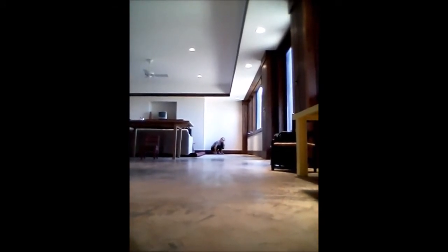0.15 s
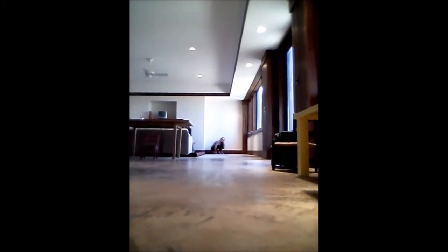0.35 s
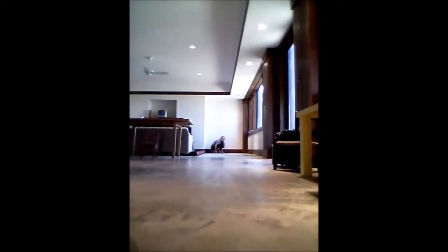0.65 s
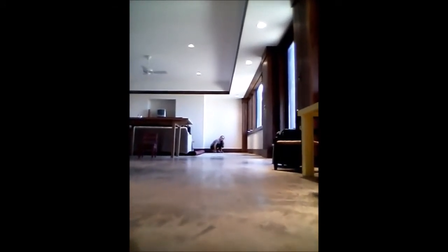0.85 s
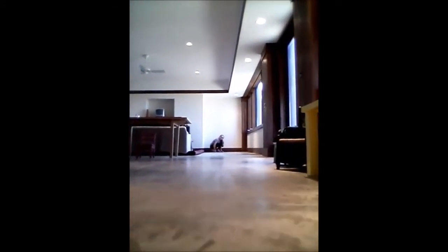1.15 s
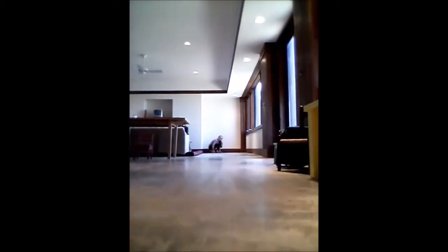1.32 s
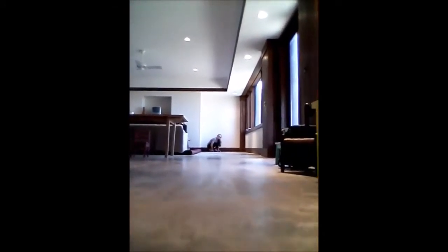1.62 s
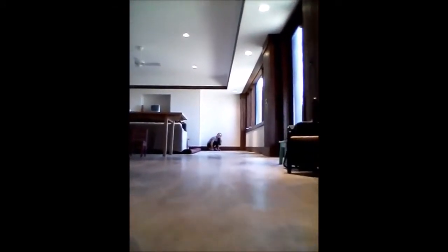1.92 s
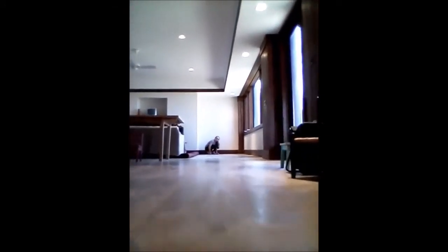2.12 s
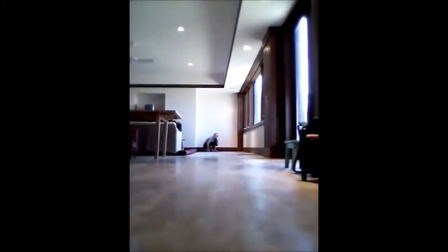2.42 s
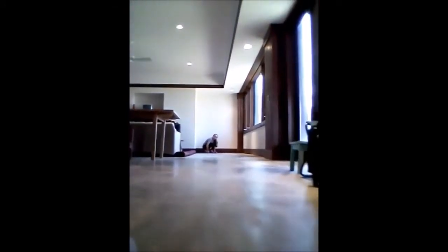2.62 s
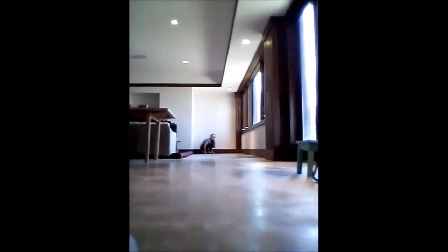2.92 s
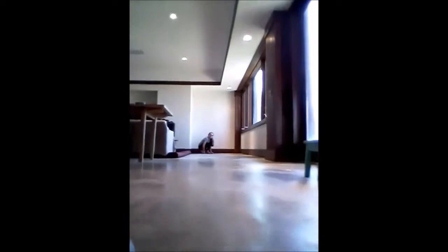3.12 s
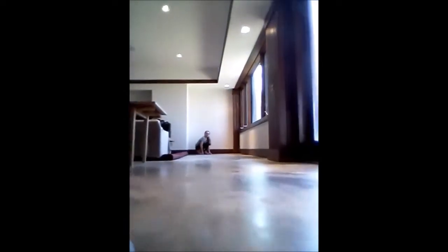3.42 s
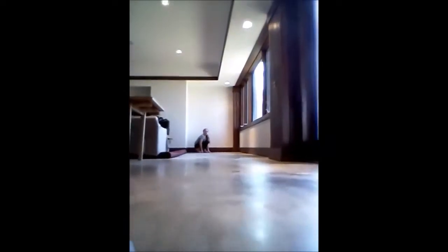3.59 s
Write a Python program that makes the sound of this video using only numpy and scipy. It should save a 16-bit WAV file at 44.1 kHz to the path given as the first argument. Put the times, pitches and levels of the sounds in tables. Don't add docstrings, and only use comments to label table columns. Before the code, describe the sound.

A light spring-driven car starts with a soft click, rolls quietly over a hard indoor floor, then gathers speed into a loud rumble with knocks, ticks and axle hiss, heard from a microphone riding on it.

```python
import sys
import numpy as np
from scipy import signal
from scipy.fft import rfft, irfft
from scipy.io import wavfile
from scipy.ndimage import uniform_filter1d, map_coordinates

SR = 44100
rng = np.random.default_rng(int(sys.argv[2]) if len(sys.argv) > 2 else 0)


def unload_audio(sound):
    columns = np.transpose(np.atleast_2d(sound))
    steps = np.round(np.clip(columns, -1, 1) * 32767)
    wavfile.write(sys.argv[1], SR, steps.astype(np.int16))


def gain_from_decibels(decibels):
    exponent = np.asarray(decibels, float) / 20
    return 10 ** exponent


N = 165375
T = np.arange(N) / SR


def rms1(x):
    return x / np.sqrt(np.mean(x ** 2))


def band(x, lo_hz, hi_hz):
    return signal.sosfilt(signal.butter(2, [lo_hz, hi_hz], "band", fs=SR, output="sos"), x)


def ring(x, hz, t60_s):
    r = np.exp(-np.log(1000) / (max(t60_s, 1e-3) * SR))
    w = 2 * np.pi * hz / SR
    return signal.lfilter([0, r * np.sin(w)], [1, -2 * r * np.cos(w), r * r], x)


def walk(rate_hz):
    hold = int(SR / rate_hz)
    steps = np.repeat(rng.standard_normal(N // hold + 1), hold)[:N]
    return rms1(uniform_filter1d(uniform_filter1d(steps, hold), hold))


def body(x, modes, drift_db=0., drift_hz=8.):
    out = np.zeros(N)
    for k, (hz, width_hz, db) in enumerate(modes):
        gain = (-1) ** k * gain_from_decibels(db) * width_hz * 2 * np.pi / SR
        drive = x * gain_from_decibels(drift_db * walk(drift_hz))
        out += gain * ring(drive, hz, np.log(1000) / np.pi / width_hz)
    return out


def grit(rate_hz, spread_db, patch_db, patch_hz):
    hit, sign, size = rng.random((3, N))
    clicks = (hit < rate_hz / SR) * np.sign(sign - .5) * gain_from_decibels(-spread_db * np.log(1 - size))
    return rms1(clicks) * gain_from_decibels(patch_db * walk(patch_hz))


def bursts(times_s, gains, lengths_s, strike):
    t = np.arange(2048) / SR
    events = []
    for s, gain, length in zip(times_s, gains, lengths_s):
        scratch = rng.standard_normal(len(t)) * np.exp(-t / length) / np.sqrt(length * SR)
        events.append((int(s * SR), gain * (scratch + strike * (t == 0))))
    return events


def add(x, start, piece):
    x[start:start + len(piece)] += piece[:len(x) - start]


# (frequency [Hz], density [dB per Hz])
AIR_SPECTRUM = [(30, -12), (125, -21.5), (300, 0), (700, -14), (1500, -22.5), (3000, -35.5), (15000, -40.5)]


def room():
    phase = 2 * np.pi * 120 * T
    hum = np.sin(phase)
    buzz = band(np.exp(4.6 * np.cos(phase)), 150., 600.)
    hz, db = np.array(AIR_SPECTRUM).T
    f = np.fft.rfftfreq(N, 1 / SR)
    shape = gain_from_decibels(np.interp(np.log(f + 1), np.log(hz), db))
    air = irfft(rfft(rng.standard_normal(N)) * shape, N)
    return gain_from_decibels(-59) * rms1(hum) + gain_from_decibels(-66) * rms1(buzz) + gain_from_decibels(-57.5) * rms1(air)


# (frequency [Hz], level [dB], t60 [s])
CATCH_MODES = [(110, 2.5, 0.18), (250, -5, 0.055), (578, 4, 0.037), (840, 1, 0.011), (1120, 1, 0.031),
               (1730, -26, 0.095)]


def catch():
    click = np.zeros(N)
    click[int(.0088 * SR)] = gain_from_decibels(-30)
    modes = sum(gain_from_decibels(db) * ring(click, hz, min(t60_s, .15)) for hz, db, t60_s in CATCH_MODES)
    scrape = signal.lfilter([1], [1, -.993], click) * rng.standard_normal(N)
    return modes + gain_from_decibels(-9) * band(scrape, 700., 3100.0)


# (time [s], level [dB])
SNAPS = [
    (1.5621, -4.5),
    (1.3345, -17),
    (2.573, -17),
    (3.168, -13),
    (3.424, -17),
    (3.542, -13.5),
    (3.181, -22),
    (3.61, -12),
    (3.651, -24),
    (3.745, -19),
]


def snaps():
    clicks = np.zeros(N)
    for s, db in SNAPS:
        clicks[int(s * SR)] = gain_from_decibels(db)
    return ring(band(clicks, 900., 6000.), 2220.0, 0.0015) + gain_from_decibels(-14) * band(clicks, 3000., 12000.0)


# (frequency [Hz], level [dB], t60 [s])
LOOSE_MODES = [(2060, -20.5, .01), (3270, -4, 0.025), (4120, -14, 0.057), (4610, 4, 0.0096),
               (5490, 4.5, 0.0046), (6070, 7.5, 0.0028), (7050, -3.5, 0.01), (9200, -36, .006),
               (10800, -47, .005)]
# (time [s], level [dB], centre [Hz])
TICKS = [(0.245, -39, 3160), (1.2917, -33.5, 4670), (1.316, -32, 6200), (1.334, -4.5, 4750),
         (1.3436, -17, 4500), (1.352, -21, 4570), (1.4386, -42, 4540), (1.511, -28.5, 3740),
         (1.5397, -30, 5690), (1.5892, -30, 4190), (1.593, -28, 5700), (1.6387, -31, 4200),
         (1.676, -34, 5610), (1.712, -32, 4470), (1.7493, -36, 5700), (1.8134, -38, 5500),
         (1.9185, -31.5, 4600), (1.962, -18, 4160), (1.997, -26, 4000), (2.062, -45, 5400),
         (2.249, -20.5, 4170), (2.2918, -32, 6000), (2.3447, -21.5, 3060), (2.4642, -19.5, 3140),
         (2.4947, -20.5, 6400), (2.5485, -16, 4840), (2.7154, -32.5, 4220), (2.8892, -23.5, 3200),
         (2.9016, -23.5, 4420), (3.0173, -31.5, 4520), (3.0284, -27, 4140), (3.0473, -25.5, 5530),
         (3.1135, -38, 4700), (3.242, -32, 5640), (3.3703, -31.5, 3200), (3.586, -31, 6500),
         (3.6043, -18.5, 3040), (3.6522, -16, 3140)]


def ticks():
    vary_db, vary_pitch = 1.5, .012
    times_s, levels_db, centres_hz = np.array(TICKS).T
    lengths_s = np.interp(levels_db, (-32, -22), (.005, .0016))
    out = np.zeros(N)
    for (start, hit), centre in zip(bursts(times_s, gain_from_decibels(levels_db), lengths_s, 4.0), centres_hz):
        hit = hit * np.minimum(np.arange(len(hit)) / SR / 0.00092 + 0.044, 1)
        for hz, db, t60_s in LOOSE_MODES:
            e = rng.standard_normal()
            off_centre_db = 25 * np.log2(hz / centre) ** 2
            gain = gain_from_decibels(db + vary_db * e - off_centre_db)
            add(out, start, gain * ring(hit, hz * (1 + vary_pitch * e), t60_s))
    return band(band(out, 2500.0, 10000.0), 1700., 14000.) * gain_from_decibels(-4)


# (frequency [Hz], width [Hz], gain [dB])
FRAME_MODES = [(73.7, 38, 3), (103.4, 32, 4.5), (186, 30.8, -1.5), (244.8, 47.3, -2.5), (318, 43, -1.5),
               (420.5, 21.4, -8.5), (539.5, 71, -11)]
# (time [s], level [dB])
LURCHES = [(0.845, -25), (1.105, -24), (1.185, -19), (1.413, -18), (1.532, -16.5), (1.758, -16.5),
           (2.017, -19.5), (2.227, -17.5), (2.309, -17.5), (2.393, -16.5), (2.532, -19), (2.656, -11),
           (2.888, -15.5), (3.159, -23), (3.233, -10), (3.514, -17), (3.668, -12.5)]
# (time [s], level [dB], pitch [Hz])
THUDS = [(0.404, -26.5, 284), (1.238, -23.5, 186), (1.676, -20.5, 196), (1.707, -23.5, 261),
         (1.851, -10.5, 183), (1.893, -8, 176), (1.955, -6.5, 327), (2.211, -16.5, 240), (2.346, -19, 299),
         (2.383, -16, 255), (2.536, -12, 194), (2.714, -9.5, 269), (2.8, -6, 276), (2.976, -17, 254),
         (3.034, -3.5, 234), (3.183, -13, 240), (3.333, -14, 250), (3.419, -8, 301), (3.517, -9, 300),
         (3.589, -6.5, 183), (3.642, -15.5, 248), (3.714, -10, 254)]


def blow(hz, rise_s, t60_s):
    t = np.arange(6000) / SR
    return np.sin(2 * np.pi * hz * t) * (1 - np.exp(-t / rise_s)) * gain_from_decibels(-60 * t / t60_s)


def thuds():
    out = np.zeros(N)
    low_hz, high_hz = FRAME_MODES[0][0], FRAME_MODES[1][0]
    swing = blow(high_hz, 0.007, 0.15) + gain_from_decibels(-6.5) * blow(low_hz, 0.018, 0.16)
    for s, db in LURCHES:
        add(out, int(s * SR), gain_from_decibels(db + 5.5) * swing)
    for s, db, hz in THUDS:
        add(out, int(s * SR), gain_from_decibels(db + 1) * blow(hz, 0.003, 0.088))
    return out


# (frequency [Hz], width [Hz], gain [dB])
DECK_MODES = [(607, 30, -2), (717.5, 62, -2), (728.5, 29.3, 6), (774.2, 64.7, -2.5), (864, 28, -10),
              (920, 87, -25.5), (1315, 46, -21.5), (1485, 50, -18.5)]
# (frequency [Hz], width [Hz], gain [dB])
AXLE_MODES = [(1028, 810, -8), (1648, 120, -4), (1850, 154, -2.5), (2112, 340, -3.5), (2296, 294, -5.5),
              (3245, 266, -20)]
# (time [s], level [dB], bright share [dB])
BUMPS = [(0.244, -33.5, -1), (0.414, -16.5, -26), (1.067, -19.5, -17), (1.505, -11, -11),
         (1.631, -12.5, -33), (1.675, -31, -9), (1.704, -2, -19.5), (1.828, -3, -32), (1.849, -8, -36),
         (1.953, -10.5, -7), (1.999, -11.5, -8), (2.097, -6, -29), (2.139, -5.5, -28), (2.25, -7.5, -22),
         (2.346, -0.5, -12.5), (2.441, -6, -18.5), (2.535, 2, -7), (2.563, -4.5, -12.5), (2.617, 1.5, -24),
         (2.644, -18, -20), (2.675, -6.5, -18), (2.712, -2, -26), (2.759, -1, -21), (2.801, 3, -28),
         (2.844, -2.5, -22), (2.981, -5.5, -21), (3.026, -3, -6), (3.071, -1, -16), (3.105, -6, -25),
         (3.151, -6, -7.5), (3.221, -8, -12), (3.27, -9, -21), (3.284, -13.5, 5.5), (3.327, -11, -25),
         (3.347, -7, -25), (3.371, 4, -12), (3.385, 2.5, -20.5), (3.419, 0, -11.5), (3.468, -3, -25.5),
         (3.562, -1, -12), (3.605, 6, -17.5), (3.649, 0.5, -10.5), (3.692, -0.5, -27), (3.711, 5.5, -22)]


def bumps():
    times_s, levels_db, bright_db = np.array(BUMPS).T
    knock, scrape = np.zeros((2, N))
    for start, hit in bursts(times_s, gain_from_decibels(levels_db), np.full(len(times_s), .007), 2.2):
        add(knock, start, hit)
    for start, hit in bursts(times_s, gain_from_decibels(levels_db + bright_db), np.full(len(times_s), .012), 0.36):
        add(scrape, start, hit)
    low = gain_from_decibels(30) * body(knock, DECK_MODES[1:4]) + gain_from_decibels(26) * body(knock, DECK_MODES[:1])
    low += gain_from_decibels(1) * band(knock, 450., 1500.0) + gain_from_decibels(24.5) * body(knock, FRAME_MODES[2:])
    high = gain_from_decibels(50) * body(scrape, DECK_MODES[4:6]) + gain_from_decibels(49) * body(scrape, DECK_MODES[6:])
    high += gain_from_decibels(37.5) * body(scrape, AXLE_MODES[:1]) + gain_from_decibels(21) * body(scrape, AXLE_MODES)
    return band(low, 110.0, 1400.) + band(high, 820.0, 5000.0)


HOPS_S = [
    .556,
    1.772,
    1.822,
    2.519,
    2.667,
    3.096,
    3.204,
    3.331,
    3.395,
]


def hops():
    return sum(np.exp(-((T - s) / .009 * 2) ** 2) for s in HOPS_S)


def loose_rattle():
    jostle = signal.lfilter([1], [1, -.985], np.abs(grit(160., 4.2, 1.5, 3.7)))
    rattle = jostle * rng.standard_normal(N) * np.clip(T - 1, .1, 1)
    parts = sum(gain_from_decibels(db) * ring(rattle * gain_from_decibels(4.5 * walk(30.)), hz, t60_s * 0.71)
                for hz, db, t60_s in LOOSE_MODES[1:])
    return rms1(band(parts, 3400.0, 11000.))


# (frequency [Hz], width [Hz], gain [dB])
STRING_MODES = [(3610, 570, 3), (4456, 210, 3.5), (4940, 90, 2.5), (5700, 190, -1.5), (6120, 170, -3.5),
                (7150, 840, -7), (10300, 990, -21.5), (12800, 2400, -23.5), (15300, 460, -22)]


def string_whirr(rub):
    crackle = .5 * rub + grit(4000., 2.1, 2.2, 65.0)
    return rms1(band(body(crackle, STRING_MODES, 1.4, 25.27), 3200.0, 15500.))


def axle_hiss(rub, rub_db, hop_gain):
    hiss = rms1(band(body(rub, AXLE_MODES, 1.35, 18.), 900., 3160.0)) * gain_from_decibels(rub_db + 0.5)
    return hiss - band(hiss, 1600.0, 12000.) * (1 - hop_gain)


def deck_shake(shared, level_db):
    turn = (T - 2.8) * 23.6 % 1
    throb = gain_from_decibels(3 * np.clip(T - 1.8, 0, 1) * np.exp(-turn / .35))
    drive = throb * (0.43 * shared + grit(900., 2.3, 0.82, 21.96))
    deck = rms1(body(drive, DECK_MODES, 2.5, 14.)) * gain_from_decibels(level_db - 2.5)
    deck *= np.clip((T - .6) / 0.52, .35, 1)
    flex_s = .0006 * walk(5.)
    return map_coordinates(deck, [(T + flex_s) * SR], order=1, mode="nearest")


def frame_rumble(shared, roll_db):
    drive = .5 * shared + grit(2500., 1.0, 1.0, 9.43)
    return rms1(body(drive, FRAME_MODES[2:], 0.86, 7.8)) * gain_from_decibels(roll_db)


def wheel_rumble(shared, roll_db):
    drive = .5 * shared + grit(1100.0, 1.9, 0.5, 9.4)
    wheels = rms1(body(drive, FRAME_MODES[:2], 0.59, 7.4)) * gain_from_decibels(roll_db - 3.5)
    return wheels * np.clip((T - 0.29) / 0.21, .15, 1)


# (time [s], rolling level [dB], axle friction [dB], string whirr [dB], deck shake [dB])
ROLL = [(.13, -67, -70, -91, 15), (.27, -40.5, -55.5, -69, -7), (.5, -43.5, -59, -78, 7.5),
        (.65, -42.5, -54.5, -69, 5.5), (.8, -43, -55, -65, 7.5), (1.15, -36.5, -45, -60, -1),
        (1.4, -28, -44.5, -54, 2), (1.58, -31, -44, -47.5, -0.5), (1.75, -27, -48, -58.5, 1),
        (1.95, -21.5, -43, -54.5, 0), (2.3, -25, -43, -55, -0.5), (2.6, -20.5, -41, -52.5, 4.5),
        (2.92, -23, -41, -53.5, 3.5), (3.2, -17, -37, -53, -9), (3.4, -16.5, -36.5, -54, 5.5),
        (3.75, -21.5, -37, -50, 0.5)]


def rolling():
    times_s, *levels = np.array(ROLL).T
    roll_db, rub_db, whirr_db, shake_db = (np.interp(T, times_s, v) for v in levels)
    moving = np.clip((T - .12) / 0.088, 0, 1)
    hop_gain = gain_from_decibels(-30 * hops())
    shared = grit(1500., 2.14, 3.84, 14.)
    rub = 0.24 * shared + grit(5000., 2.8, 2.6, 45.)
    low = wheel_rumble(shared, roll_db) + frame_rumble(shared, roll_db)
    low = low + deck_shake(shared, roll_db + shake_db)
    whirr = string_whirr(rub) * gain_from_decibels(whirr_db + 0.5) * hop_gain
    rattle = loose_rattle() * gain_from_decibels(whirr_db - 14.5) * hop_gain
    return moving * (band(low, 26.0, 2000.) + axle_hiss(rub, rub_db, hop_gain) + whirr + rattle)


def scene():
    return (rolling() + bumps() + thuds() + ticks() + snaps() + catch() + room())[None]


def low_pass(x):
    return signal.sosfilt(signal.butter(12, 16340, fs=SR, output="sos"), x)


def record(dry):
    x = signal.sosfilt(signal.butter(3, 59.4, "high", fs=SR, output="sos"), dry)
    x = x / (1 + np.abs(x) ** 6) ** (1 / 6)
    x = signal.sosfilt(signal.ellip(10, .2, 70, 15800, fs=SR, output="sos"), x)
    return low_pass(x)


dry = scene()
out = record(dry)
unload_audio(out)
```